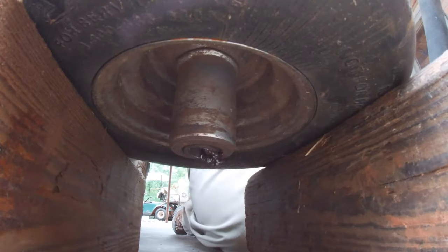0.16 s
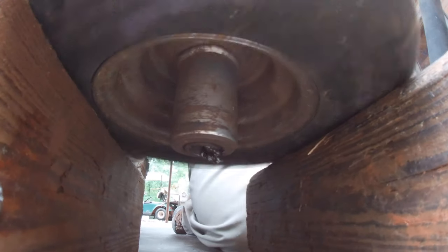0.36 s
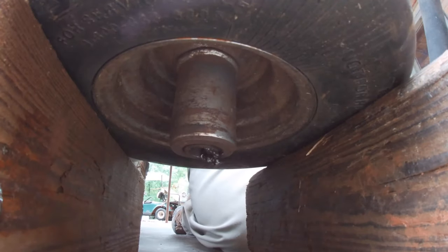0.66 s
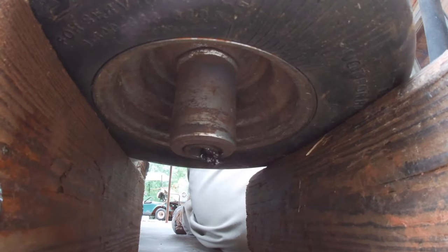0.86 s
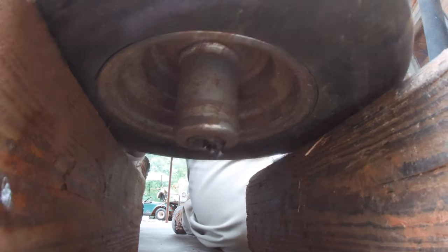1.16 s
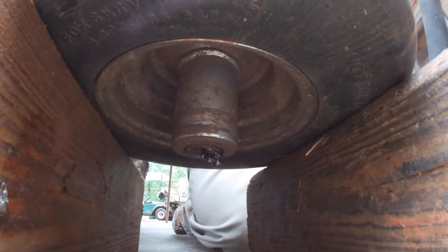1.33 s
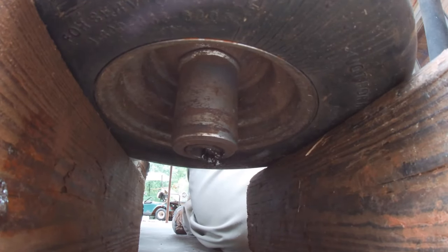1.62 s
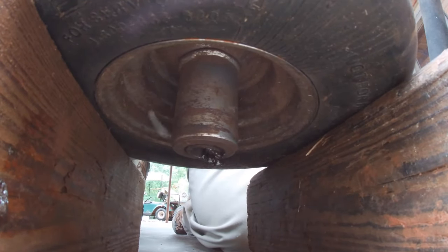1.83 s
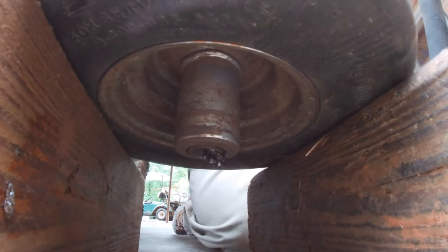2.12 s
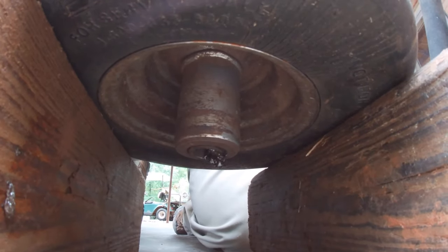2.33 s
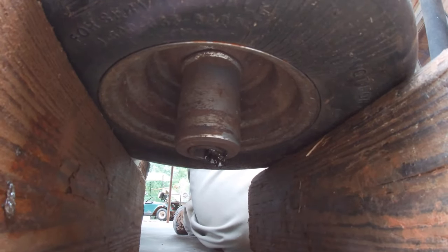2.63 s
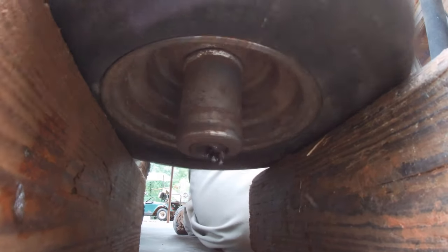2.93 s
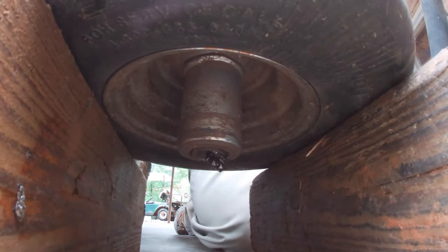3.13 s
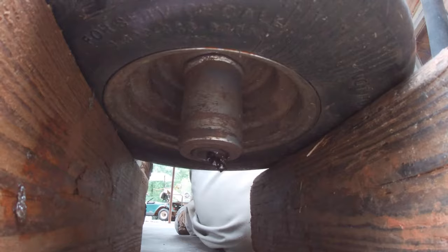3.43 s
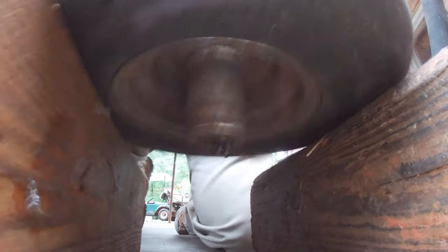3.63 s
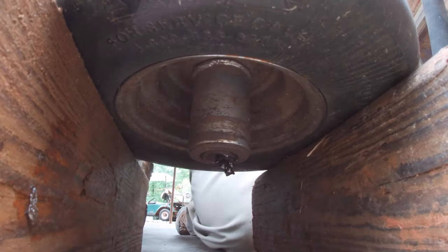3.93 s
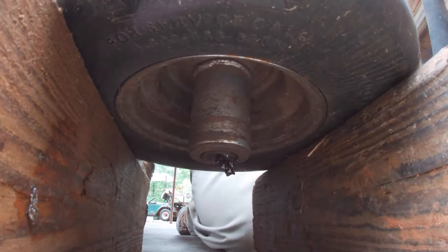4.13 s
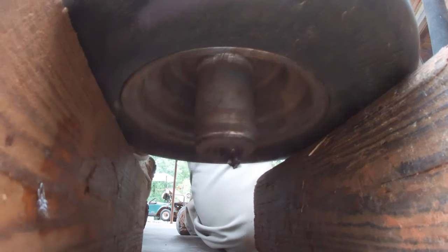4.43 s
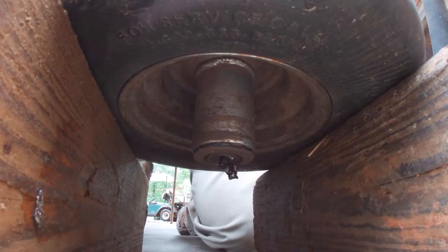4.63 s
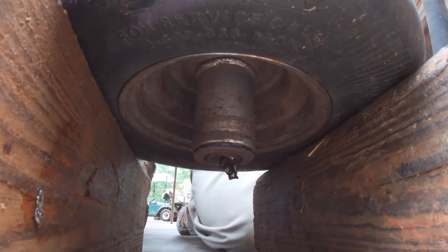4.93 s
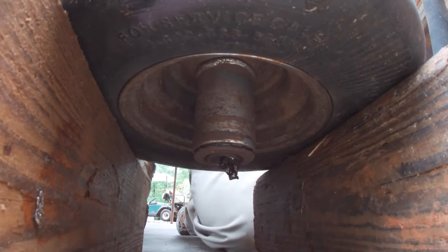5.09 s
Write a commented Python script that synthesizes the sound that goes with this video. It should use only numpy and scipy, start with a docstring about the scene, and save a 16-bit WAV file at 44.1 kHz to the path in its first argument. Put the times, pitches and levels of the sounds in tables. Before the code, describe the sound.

Outdoors, close beneath a wheel lying across two timber blocks. A muffled hiss sits over a faint low rumble, then drops away around the first hammer blow at 0.3 seconds. Six more blows follow at about 1.2, 2.0, 2.85, 3.65, 4.45 and 5.2 seconds. Each starts with an extremely quick swell of narrow metallic tones, bursts into a rough crack, and booms low around 300 hertz, with a grainy, fluttering hum lasting a few tenths of a second. Roughly 0.1 seconds after each of the first six, the wheel lands on the timber with paired dull thuds and light clicks, then bounces once. Small loose-steel ticks appear near 0.4, 1.2, 2.7 and 2.9 seconds. The seventh blow has less boom and a brighter ring; immediately afterward the bearing breaks loose in a tight, sharp clatter. The close microphone overloads, rounding the loud peaks.

```python
"""A muffled hiss over a low outdoor rumble comes first; the hiss dies away around the first hammer blow.
A hammer then drives a bearing out of a wheel hub with a steel punch: seven blows, heard close under the wheel.
Narrow tones swell in before each blow; it cracks as noise and booms as fading tones of the wheel.
After the first six blows the wheel lands on its two timber blocks and bounces once, with thuds and clicks.
Loose steel ticks in between; at the last blow the bearing breaks loose and rattles."""
import sys
import numpy as np
from scipy import signal
from scipy.fft import rfft, irfft
from scipy.io import wavfile

SR = 44100
rng = np.random.default_rng(int(sys.argv[2]) if len(sys.argv) > 2 else 0)


def unload_audio(sound):
    """Save the sound as a 16-bit wav file, at the path given as the first command line argument."""
    columns = np.transpose(np.atleast_2d(sound))
    # keep every value between -1 and 1, then stretch to whole-number steps
    steps = np.round(np.clip(columns, -1, 1) * 32767)
    wavfile.write(sys.argv[1], SR, steps.astype(np.int16))


N = 231966

LEAD_S = 0.07  # each one-second event starts this long before its contact
AGE = np.arange(SR) / SR - LEAD_S  # seconds since contact, negative before it
AFTER = np.maximum(AGE, 0)


def undb(db):
    """Turn decibels into gain."""
    return 10 ** (np.asarray(db) / 20)


def fade(t, t60):
    """Die away exponentially, 60 dB down after t60."""
    return np.exp(-np.log(1000) * t / t60)


def colour(x, points):
    """Filter by (f/Hz, level/dB) points joined on a log-frequency axis."""
    hz, db = np.transpose(points)
    f = np.maximum(np.fft.rfftfreq(len(x), 1 / SR), 1)
    gain = undb(np.interp(np.log(f), np.log(hz), db))
    return irfft(rfft(x) * gain, len(x))


def noise(points, size):
    """Make coloured noise with an rms of 1."""
    x = colour(rng.standard_normal(size), points)
    return x / x.std()


def add(track, s, event):
    """Mix in an event whose contact falls at s seconds."""
    start = int((s - LEAD_S) * SR)
    part = event[:N - start]
    track[start:start + len(part)] += part


def struck(modes, contact_ms):
    """Ring fading tones with a smooth push; a longer contact sounds duller."""
    ring = np.zeros(len(AGE))
    for hz, db, t60 in modes:
        ring += undb(db) * np.sin(2 * np.pi * hz * AFTER) * fade(AFTER, t60)
    ms = np.arange(SR // 50) * 1000 / SR
    push = np.sin(np.pi * np.minimum(ms / contact_ms, 1)) ** 2
    return -signal.fftconvolve(ring, push / push.sum())[:len(AGE)]


def burst(points, rise_s, hold_s, t60, tail_db, tail_t60):
    """Contact noise: quick rise, short grind, fast decay, then a faint tail from the gap under the wheel."""
    since = np.maximum(AGE - hold_s, 0)
    rise = fade(np.maximum(-AGE, 0), rise_s)
    decay = fade(since, t60) + undb(tail_db) * fade(since, tail_t60)
    return rise * decay * noise(points, len(AGE))


def grains(spread_db, size=96):
    """Uneven gain, drawn anew every size samples and joined by straight dB slopes; its rms is 1."""
    knots = AGE[::size]
    gain = undb(np.interp(AGE, knots, spread_db * rng.standard_normal(len(knots))))
    return gain / np.sqrt(np.mean(gain ** 2))


# colour of the low rumble: (f/Hz, level/dB)
RUMBLE_COLOUR = [(15, -40.5), (25, -10.5), (103, 2.5), (207, -7), (237, 0), (264, -1.5), (344, -4.5),
                 (543, -23.5), (729, -23.5), (1000, -35.5), (3180, -49), (3440, -45.5), (15000, -73.5)]
# colour of the muffled hiss: (f/Hz, level/dB)
HISS_COLOUR = [(15, -41), (25, -8), (112, -1), (309, -7.5), (363, -7), (450, -11.5), (604, -14),
               (655, -16.5), (2240, -34.5), (8550, -41), (15000, -64)]
# how loud the hiss is over time: (t/s, level/dB)
HISS_FADE = [(0, -37.5), (0.282, -36.5), (0.339, -48), (0.549, -55.5), (1.301, -53), (1.698, -75)]
RUMBLE_DB = -51


def outdoors():
    """Coloured noise: a steady low rumble, and a hiss that dies away around the first blow."""
    hiss_db = np.interp(np.arange(N) / SR, *np.transpose(HISS_FADE))
    rumble = undb(RUMBLE_DB) * noise(RUMBLE_COLOUR, N)
    hiss = undb(hiss_db) * noise(HISS_COLOUR, N)
    return rumble + hiss


# tones of the wheel on its timber blocks: (f/Hz, level/dB, 60 dB decay t/s)
TIMBER_TONES = [(46.6, -15, 0.24), (72, -16, 0.035), (114, 0, 0.066), (176.7, -3, 0.06), (287.5, 3, 0.05),
                (304.5, -2.5, 0.14), (393, 1, 0.04), (732, -14, 0.054)]


def timber_thud(thud_db, contact_ms):
    """A push on the timber makes its short, low tones ring."""
    return undb(thud_db) * struck(TIMBER_TONES, contact_ms)


# colour of the click noise before its tilt: (f/Hz, level/dB)
CLICK_COLOUR = [(100, -2), (600, 22.5), (1500, 3.5), (3000, 5), (5500, -3), (8000, -9.5), (12000, -26.5),
                (16000, -24.5)]


def knock(thud_db, contact_ms, click_db, tilt):
    """A thud on the timber while loose steel scrapes and clicks; tilt brightens the click, in dB per octave."""
    click = burst(CLICK_COLOUR, rise_s=0.025, hold_s=0.003, t60=0.03, tail_db=-22, tail_t60=0.14)
    # four octaves lie between the two points
    click = colour(click * grains(spread_db=4), [(500, -2 * tilt), (8000, 2 * tilt)])
    return timber_thud(thud_db, contact_ms) + undb(click_db) * click


# steel ticks between the blows and the freed bearing's clatter after the last:
# (t/s, thud level/dB, click level/dB, click brightness/dB per octave)
STEEL_KNOCKS = [(0.389, -34, -43.5, 9), (.436, -26.5, -56, 13), (1.227, -49, -50, 5.5),
                (2.718, -46, -61, 5), (2.932, -26.5, -49, 3), (5.192, -15, -27.5, 5),
                (5.199, -16.5, -17.5, 4), (5.209, -6, -23, 4), (5.233, -44, -32.5, 0.5),
                (5.251, -35, -35.5, 0.5)]
RATTLE_CONTACT_MS = 3.47


def rattles():
    """Loose steel knocks about in the hub: each knock is a thud and a click."""
    out = np.zeros(N)
    for s, thud_db, click_db, tilt in STEEL_KNOCKS:
        add(out, s, knock(thud_db, RATTLE_CONTACT_MS, click_db, tilt))
    return out


# the wheel comes down after each blow but the last: (t/s, first thud level/dB, landing contact t/ms,
# lag of the second block t/s, landing click level/dB, level of the whole bounce/dB)
WHEEL_LANDINGS = [ (0.391, -16, 7.9, 0.016, -42.5, -1), (1.253, -16, 2.4, 0.0012, -43, 1.5),
                  (2.068, -16, 2.74, .014, -43.5, 1), (2.952, -9, 3.37, .011, -43.5, -5.5),
                  (3.747, -7, 3.7, .004, -42, -2), (4.515, -9.5, 2.07, 0.00344, -36.5, -14)]
SECOND_BLOCK_DB = -5.5  # thud, against the first block
LANDING_BRIGHT_DB, BOUNCE_BRIGHT_DB = -2, 4.5  # click brightness per octave
BOUNCE_SHARE = 0.74  # second flight time, as a share of the first
BOUNCE_MIN_CONTACT_MS, BOUNCE_CLICK_DB = 4.2, -5.5  # click against the landing's


def hops():
    """The wheel drops on one block, then the other, and bounces once more after a shorter flight."""
    out = np.zeros(N)
    for (blow_s, *_), landing in zip(HAMMER_BLOWS, WHEEL_LANDINGS):
        s, thud_db, contact_ms, lag_s, click_db, bounce_db = landing
        add(out, s, timber_thud(thud_db, contact_ms))
        second = knock(thud_db + SECOND_BLOCK_DB, contact_ms, click_db, LANDING_BRIGHT_DB)
        add(out, s + lag_s, second)
        bounce_s = s + BOUNCE_SHARE * (s - blow_s)
        bounce_contact_ms = max(contact_ms, BOUNCE_MIN_CONTACT_MS)
        bounce = knock(thud_db, bounce_contact_ms, click_db + BOUNCE_CLICK_DB, BOUNCE_BRIGHT_DB)
        add(out, bounce_s, undb(bounce_db) * bounce)
    return out


# colour of the grainy noise after a blow: (f/Hz, level/dB)
GRAINY_COLOUR = [(40, -10.5), (130, 5.5), (300, 10.5), (420, 4.5), (580, -8), (1000, -20.5), (2000, -30.5),
                 (3000, -26.5), (6000, -38.5), (9000, -48.5), (16000, -61.5)]


def grainy_noise(build_s=0.017):
    """Uneven grains of noise build up over 17 ms after the blow, then fade."""
    shape = np.minimum(AFTER / build_s, 1) * fade(AFTER, t60=0.64)
    rasp = grains(spread_db=5) * rng.standard_normal(len(AGE))
    rasp = colour(rasp, GRAINY_COLOUR)
    return shape * rasp / rasp.std()


# tones of the wheel disc and tyre: (f/Hz, level/dB, 60 dB decay t/s)
WHEEL_TONES = [(52, -31.5, 1), (170, -12, 0.078), (227.7, -11.5, 0.094), (277.7, -5, 0.16),
               (301.64, -2.5, 0.18), (266.3, -22, 0.8), (291.8, -19, 0.79), (312.7, -19.5, 0.71),
               (317.5, -26, 0.38), (352, -27.5, 0.26), (360, -17, 0.047), (430, -8.5, 0.046),
               (453, -43.5, 0.97), (539, -45, 0.94)]


def wheel_boom():
    """A short push makes the wheel boom; its rocking makes the long hum flutter."""
    # the flutter fades in from 30 to 70 ms after contact
    flutter = grains(spread_db=4, size=600) ** np.clip((AGE - 0.03) / 0.04, 0, 1)
    return struck(WHEEL_TONES, contact_ms=1.0) * flutter


# colour of the crack noise: (f/Hz, level/dB)
CRACK_COLOUR = [(60, -0.5), (350, 14), (700, -0.5), (1400, -4), (3000, -14.5), (5000, -21.5), (8000, -31),
                (12000, -36), (16000, -44.5)]


def seat_crack():
    """The bearing jolts along its seat in a brief burst of noise."""
    return burst(CRACK_COLOUR, rise_s=0.0036, hold_s=0.0015, t60=0.02, tail_db=-32, tail_t60=0.11)


# colour of the swell shared by all blows: (f/Hz, level/dB)
SHARED_SWELL_COLOUR = [(250, 1), (750, -2), (1100, -6), (1500, -5), (2000, -7), (3000, -8.5), (5500, -8.5),
                       (9000, -15.5), (12000, -6)]
TILT_PIVOT_HZ, HUMP_WIDTH_OCTAVES = 691, 0.18  # where the tilt starts; width of the hump


def swell_colour(swell_db, bright_db, peak_hz, peak_db):
    """Colour of one swell: the shared colour, tilted, with a hump around one frequency."""
    hz = np.geomspace(100, 16000, 90)
    shared_hz, shared_db = np.transpose(SHARED_SWELL_COLOUR)
    shared = np.interp(np.log(hz), np.log(shared_hz), shared_db)
    tilt = bright_db * np.log2(np.maximum(hz / TILT_PIVOT_HZ, 1))
    octaves_off = np.log2(hz / peak_hz)
    hump = peak_db * np.exp(-0.5 * (octaves_off / HUMP_WIDTH_OCTAVES) ** 2)
    return np.column_stack([hz, swell_db + shared + tilt + hump])


# narrow tones of the swell, before each blow's colour and scatter: (f/Hz, level/dB)
SWELL_TONES = [(138, -18.5), (238, -12.5), (330, -15.5), (511, -23.5), (600, -27.5), (700, -26.5),
               (795, -23), (985, -27.5), (1090, -33), (1255, -32.5), (1450, -23.5), (1640, -32),
               (1725, -32), (2110, -28), (2485, -30.5), (2685, -28.5), (2860, -30.5), (3060, -29.5),
               (3330, -29.5), (3610, -36), (3890, -33), (4280, -33), (5130, -43), (5410, -41.5),
               (6830, -49.5), (7800, -50), (8800, -47.5), (11400, -52.5), (12100, -52.5)]
# colour of the noise among those tones, before each blow's colour: (f/Hz, level/dB)
SHIMMER_COLOUR = [(40, -11.5), (140, -2), (260, 4), (500, -1.5), (1000, -15.5), (3000, -6), (4400, -16),
                  (6000, -36), (12000, -43.5), (16000, -59)]


def tonal_swell(t60, tone, extra_tones, rise_s=0.045, early_s=0.0027, shimmer_db=-18):
    """Narrow tones swell in over some 35 ms before each blow, then fade quickly, leaving a faint tail."""
    hz, db = np.transpose(SWELL_TONES)
    tone_hz, tone_db = np.transpose(tone)
    # every blow scatters the levels by about 2 dB and the pitches by about 0.4 percent
    db = db + 2 * rng.standard_normal(len(db)) + np.interp(np.log(hz), np.log(tone_hz), tone_db)
    hz = hz * (1 + 0.0041 * rng.standard_normal(len(hz)))
    hz, db = np.hstack([[hz, db], np.transpose(extra_tones)])
    phase = rng.uniform(0, 2 * np.pi, (len(hz), 1))
    partials = undb(db) @ np.sin(2 * np.pi * hz[:, None] * AGE + phase)
    # a shimmer of noise fills in between the narrow tones
    shimmer = colour(noise(SHIMMER_COLOUR, len(AGE)), tone)
    before, since = np.maximum(-AGE - early_s, 0), np.maximum(AGE + early_s, 0)
    swell = fade((before / rise_s) ** 1.4, 1)
    decay = fade(since, t60) + undb(-46) * fade(since, 0.28)
    return swell * decay * (partials + undb(shimmer_db) * shimmer)


# the hammer blows; each swell is strongest around one frequency and has its own high tones:
# (t/s, boom level/dB, crack level/dB, swell level/dB, swell brightness/dB per octave,
#  strongest f/Hz, hump level/dB, high tone f/Hz, high tone level/dB)
HAMMER_BLOWS = [ (0.3113, -3.5, 1, -2, -2, 466, 3, 5240, -44),
                (1.1726, -1.5, -1.5, 0, 0, 3030, 19, 6970, -43), (1.986, 0, -8, 1, -2, 4155, 3, 7170, -38),
                (2.8490, -2.5, -17, -1, 1, 2900, 8, 6970, -40.5),
                (3.643, -2, -9, -3.5, 0.5, 3140, 6, 5660, -42.5),
                (4.4378, -4.5, -9.5, 1.5, -.5, 2850, 4.5, 5490, -43),
                (5.1823, -10.5, -5.5, -1, 2.5, 1900, 8.5, 5130, -24.5)]
SWELL_T60_S, LAST_SWELL_T60_S = 0.049, 0.061  # the last blow's swell fades more slowly
TWIN_SPLIT_HZ, TWIN_DB = 277, -3.5  # the high tone has a weaker twin above it
PEAK_TONE_DB = -36.5  # a tone at the strongest frequency, before the blow's own levels
GRAINY_DB = -30


def hammer():
    """Each blow is led in by a tonal swell, cracks at the bearing's seat and makes the wheel boom."""
    out = np.zeros(N)
    for blow in HAMMER_BLOWS:
        s, boom_db, crack_db, swell_db, bright_db, peak_hz, peak_db, high_hz, high_db = blow
        tone = swell_colour(swell_db, bright_db, peak_hz, peak_db)
        swell_t60 = LAST_SWELL_T60_S if s == HAMMER_BLOWS[-1][0] else SWELL_T60_S
        extra_tones = [(high_hz, high_db),
                       (high_hz + TWIN_SPLIT_HZ, high_db + TWIN_DB),
                       (peak_hz, PEAK_TONE_DB + swell_db + peak_db)]
        event = undb(boom_db) * wheel_boom()
        event += undb(crack_db) * seat_crack()
        event += undb(GRAINY_DB) * grainy_noise()
        event += tonal_swell(swell_t60, tone, extra_tones)
        add(out, s, event)
    return out


def scene():
    """Everything at one microphone under the hub."""
    return (outdoors() + rattles() + hops() + hammer())[None]


def record(dry, low_hz=30, top_hz=15500):
    """The overloaded microphone rounds the peaks; deep bass and top are cut."""
    bass_cut = signal.butter(1, low_hz, "highpass", fs=SR, output="sos")
    thinned = signal.sosfilt(bass_cut, dry)
    rounded = thinned / (1 + thinned ** 4) ** (1 / 4)
    top_cut = signal.ellip(8, 0.2, 70, top_hz, fs=SR, output="sos")
    return signal.sosfilt(top_cut, rounded)


dry = scene()
out = record(dry)
unload_audio(out)
```